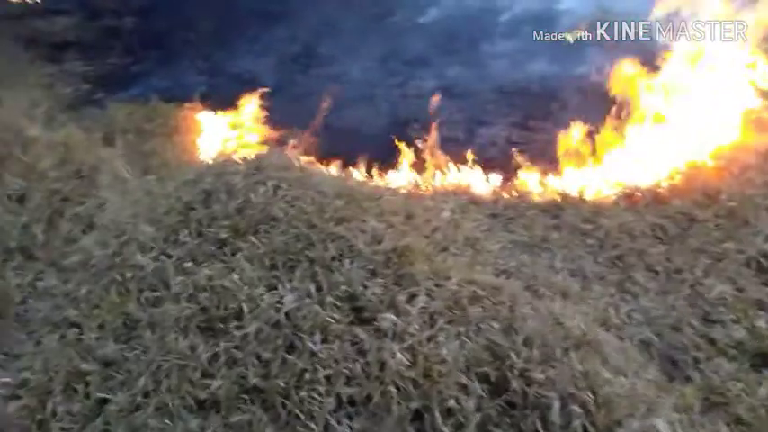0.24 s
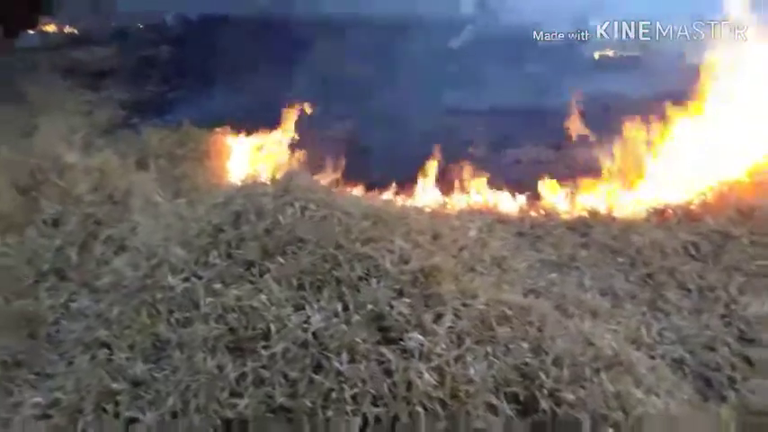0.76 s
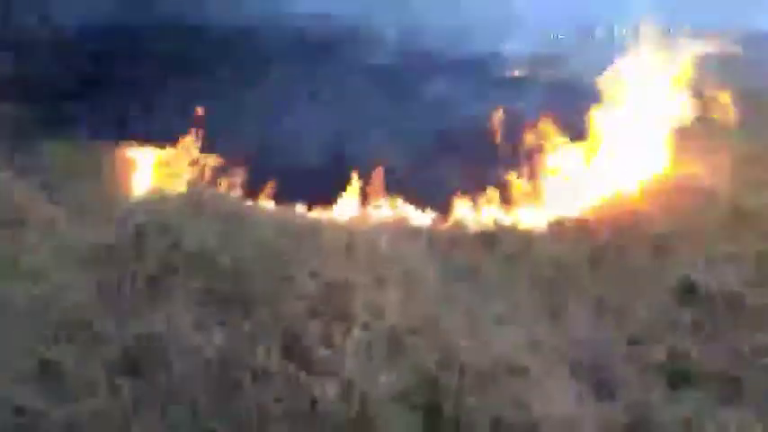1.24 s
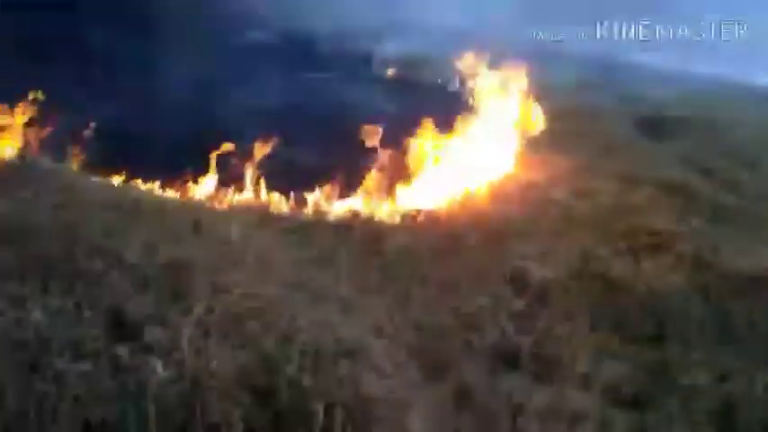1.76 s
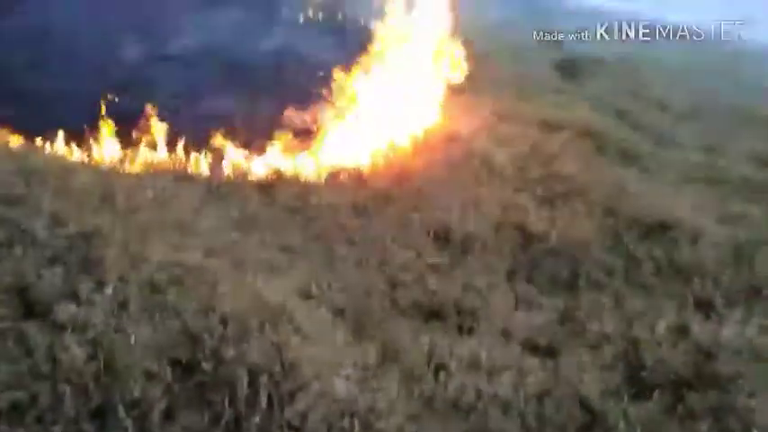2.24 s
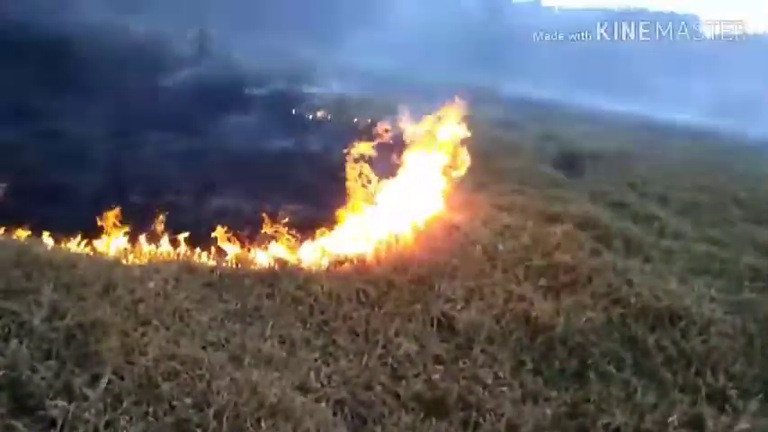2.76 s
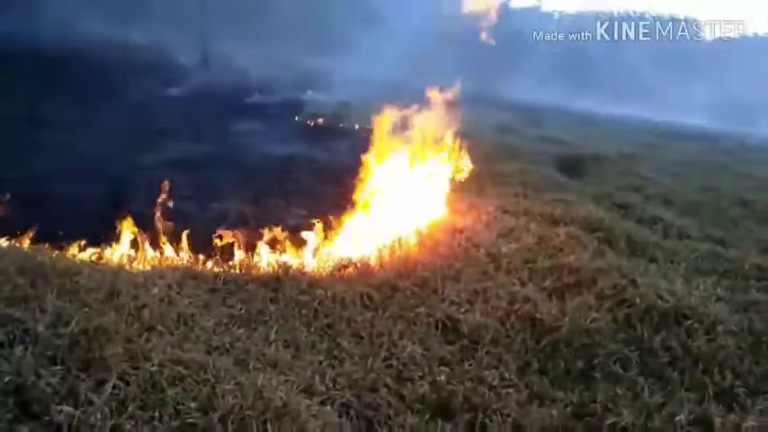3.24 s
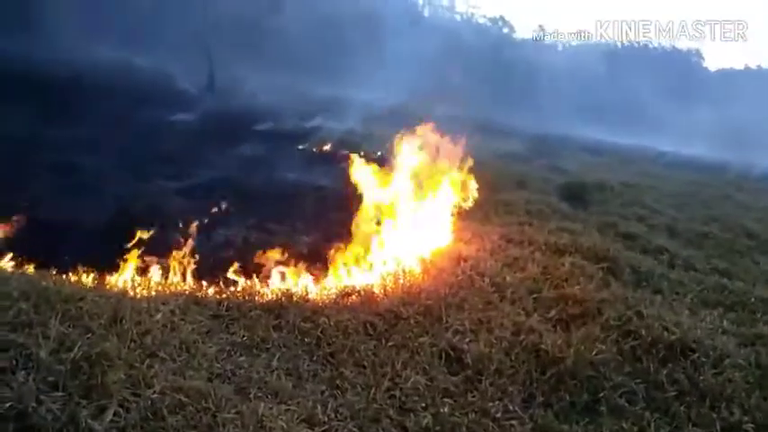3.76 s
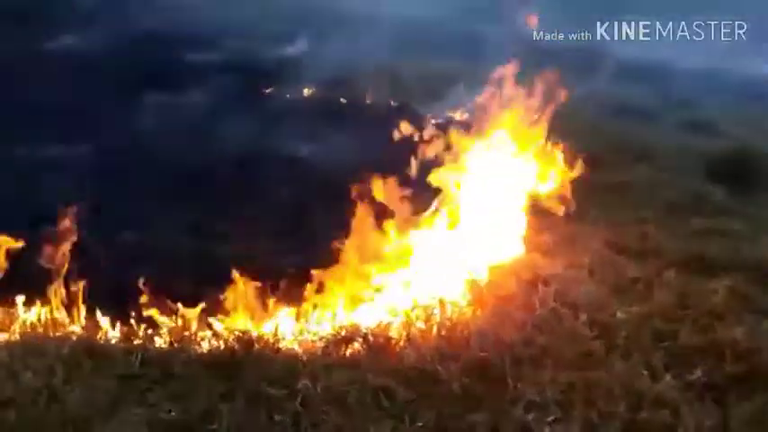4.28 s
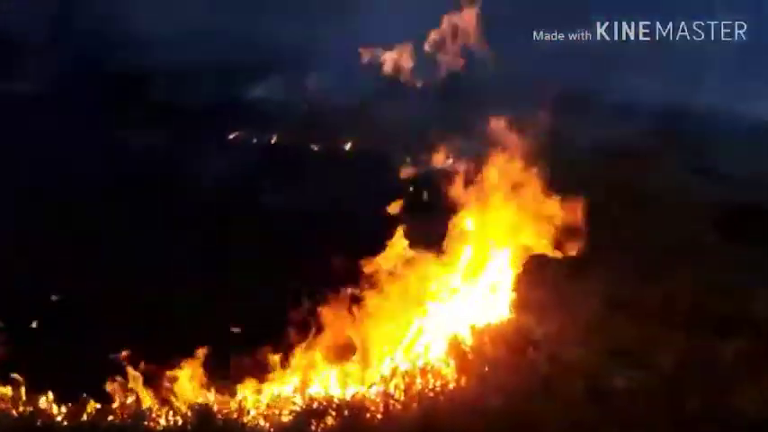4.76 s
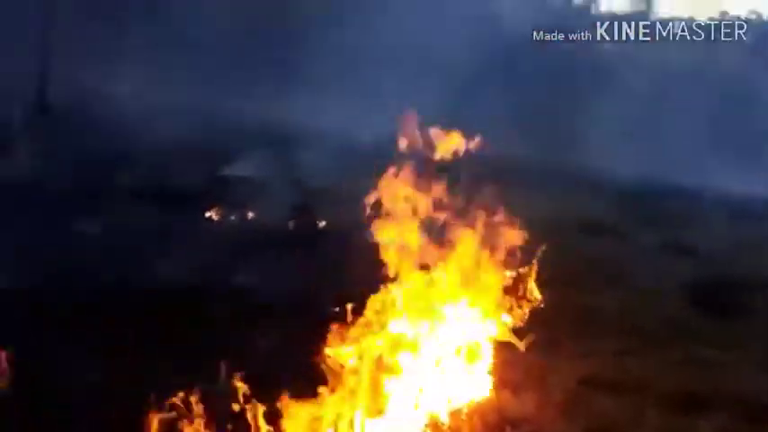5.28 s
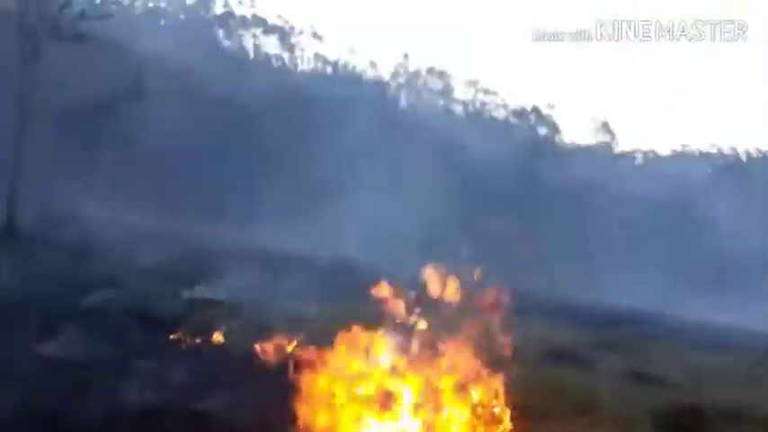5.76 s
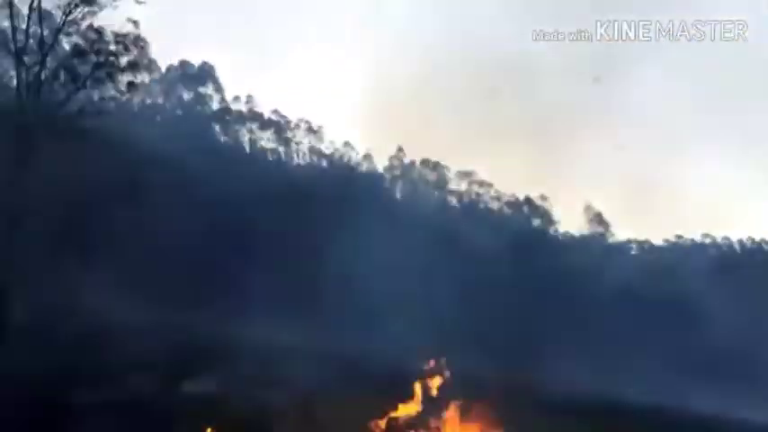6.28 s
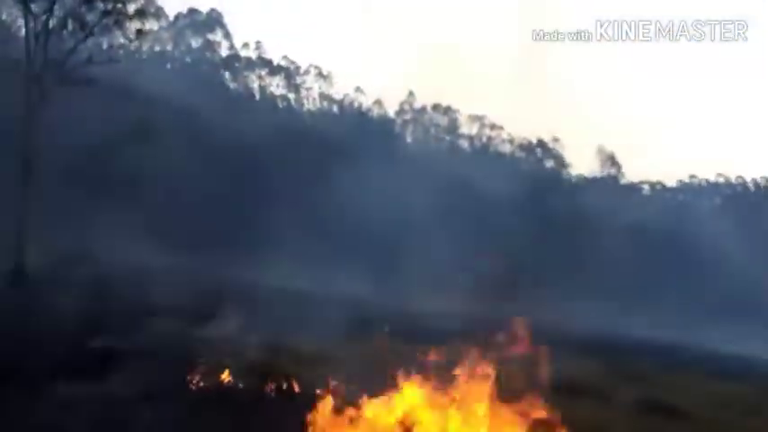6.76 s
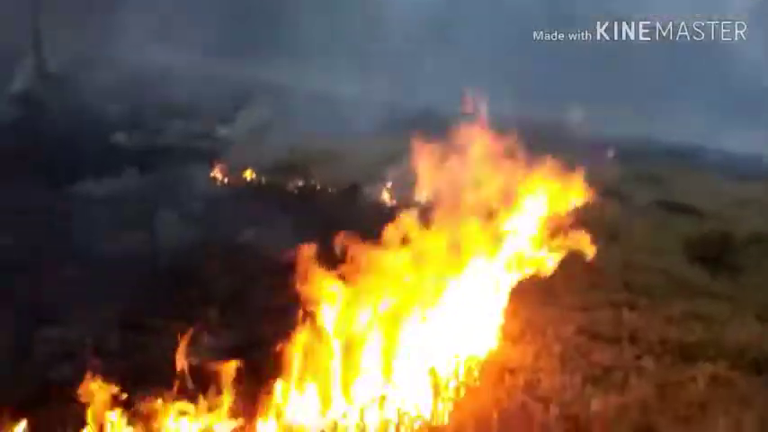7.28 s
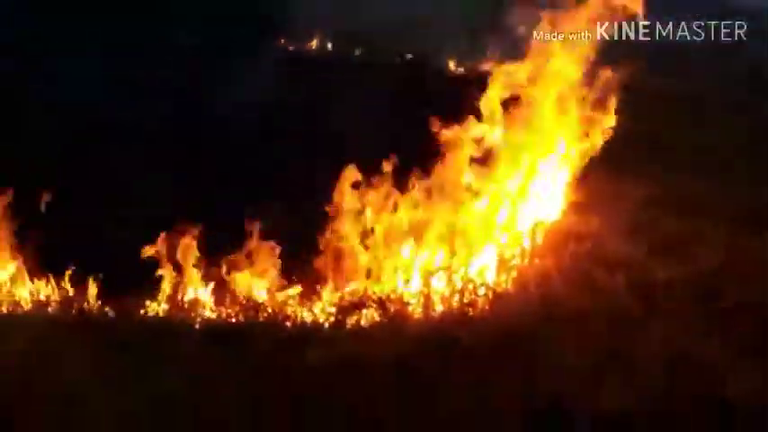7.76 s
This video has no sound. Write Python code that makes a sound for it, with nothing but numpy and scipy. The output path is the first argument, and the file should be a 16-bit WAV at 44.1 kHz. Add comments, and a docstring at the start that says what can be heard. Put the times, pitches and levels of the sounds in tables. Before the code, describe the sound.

Close, outdoor grass fire captured on a hand-held phone with wide stereo and no room echo. Constant fine hiss and fizz carry countless tiny crackles, with louder stalks cracking irregularly, some bright and ticking, others dull and woody. Underneath, a soft low flame roar flutters and puffs. The first two and a half seconds are roughest, with gusts and thumps; later it settles, thins, and ends with a fresh burst of snaps and rising sizzle.

```python
"""A thin sizzle and faint snaps of burning dry grass fade in; then flames rush, rumble, puff, thump and whoosh.
Flame noise is coloured noise in flickering lumps, its level set by a steady burn and surges; snaps and crackle
are torn-fibre bursts ringing hollow stalks, puffs and thumps short low tones, buffeting separate noise per port.
A hand-held phone hears it at one bright and one dull port; each is subtracted late from the other for width."""
import sys
import numpy as np
from scipy import signal
from scipy.fft import rfft, irfft, next_fast_len
from scipy.io import wavfile
from scipy.ndimage import map_coordinates

SR = 44100
rng = np.random.default_rng(int(sys.argv[2]) if len(sys.argv) > 2 else 0)


def put_to_file(sound):
    """Save the sound as 16-bit audio at rate SR, in the file named by the first command-line argument."""
    columns = np.atleast_2d(sound).T  # one column per channel
    safe = np.clip(columns, -1, 1)
    whole_steps = np.round(safe * 32767)
    wavfile.write(sys.argv[1], SR, whole_steps.astype(np.int16))


def invert_db(level):
    """Linear amplitude ratio for a level in decibels (20 dB per decade), elementwise."""
    return 10 ** (np.asarray(level, dtype=float) / 20)


N = 353682  # samples
START_S = .165  # the sound fades in here


def along(points, hz):
    """Interpolates (f/Hz, value) points on a log frequency axis."""
    f, value = np.transpose(points)
    return np.interp(np.log(hz + 1), np.log(f + 1), value)


def unit(x):
    """Scales to rms 1."""
    return x / np.sqrt(np.mean(x ** 2) + 1e-20)


def wobble(rate):
    """A smooth random curve with rate knots a second."""
    knots = rng.standard_normal(int(N * rate / SR) + 4)
    return map_coordinates(knots, [np.arange(N) * rate / SR])


def filtered(x, response):
    """Multiplies the spectrum by a complex response of frequency."""
    size = next_fast_len(N + 8192)
    return irfft(rfft(x, size) * response(np.fft.rfftfreq(size, 1 / SR)), size)[..., :N]


def resonance(f, hz, width_hz):
    """A causal resonance of gain 1 at its centre."""
    damping = 1j * f * width_hz
    return damping / (hz * hz - f * f + damping + 1e-9)


def pair(shape, alike):
    """Noise for both ports that share the part alike of its power."""
    common = rng.standard_normal(shape)
    own = rng.standard_normal((2,) + shape)
    return np.sqrt(alike) * common + np.sqrt(1 - alike) * own


def lumpy_noise(spectrum, alike, lumps_db):
    """Coloured noise at both ports, swelling in lumps, with rms 1 overall."""
    lumps = invert_db(lumps_db) * pair((N,), alike)
    return unit(filtered(lumps, lambda hz: invert_db(along(spectrum, hz))))


def place(times, shapes):
    """Sums short shapes (ports, events, samples) at their times."""
    at = np.round(times * SR).astype(int)[:, None] + np.arange(shapes.shape[-1])
    return np.array([np.bincount(at.ravel(), port.ravel(), N + SR)[:N] for port in shapes])


def flares(times, db, rise_s, fall_s):
    """A gain that leaps at each time and dies away exponentially."""
    t = np.arange(SR // 8) / SR
    kicks = np.bincount(np.round(times * SR).astype(int), invert_db(db), N)[:N]
    return signal.fftconvolve(kicks, (1 - np.exp(-t / rise_s)) * np.exp(-t / fall_s))[:N]


def crests(base_db, s, db, climb_s, sink_s):
    """A level in dB: swells climb to a crest and sink again, their power added to a base."""
    time = np.arange(0, N + 64, 64) / SR
    since = time - s[:, None]
    # time per 10 dB, held between 5 ms and 1 s
    pace_s = np.clip(np.where(since < 0, climb_s[:, None], sink_s[:, None]), .005, 1)
    swells = invert_db(db[:, None] - 10 * np.abs(since) / pace_s) ** 2
    power = np.interp(np.arange(N) / SR, time, swells.sum(axis=0))
    return 10 * np.log10(invert_db(base_db) ** 2 + power)


# the steady burn between surges: t/s, sizzle level/dB, roar level/dB, extra rumble level/dB
STEADY_BURN = [(.18, -54.5, -55.5, -14), (.3, -47, -48.5, 0.5), (.76, -47, -52, 1), (1.0, -50, -48, 5),
               (1.3, -42, -48, 2.5), (1.72, -73, -50, -2.5), (1.95, -50, -53, -1), (2.4, -50, -43.5, -2.5),
               (2.9, -50, -51, -2.5), (3.55, -51, -46.5, -1.5), (4.02, -51.5, -56.5, -1.5),
               (4.69, -58, -55.5, -2.5), (5.25, -54.5, -52.5, -2), (5.65, -47, -51, -2),
               (6.28, -54, -58.5, 1.5), (6.75, -49.5, -55.5, 0), (7.1, -52.5, -53, 0.5),
               (7.58, -49.5, -55, -3.5), (8, -41, -56.5, -0.5)]
# fresh tufts catch and the fire surges: crest t/s, sizzle level/dB, roar level/dB,
# climb of 10 dB t/s, sink of 10 dB t/s
FIRE_SURGES = [(0.375, -39, -41, -0.07, 0.19), (.93, -48, -45, 0.05, -0.05), (1.1, -40, -44.5, 0.08, 0.2),
               (1.3, -36, -39.5, 0.05, 0), (1.392, -31.5, -36, 0.03, 0.12), (1.47, -41, -38, 0.15, 0),
               (1.6, -37, -61, 0.15, 0.15), (1.807, -37.5, -37.5, -0.02, 0.11),
               (2.17, -44.5, -50, 0.04, 0.4), (2.51, -39.5, -42.5, 0.1, 0.08), (2.69, -40.5, -63, 0, 0.2),
               (3.1, -42.5, -51.5, 0.2, 0.3), (3.477, -36, -43, 0.16, 0.03),
               (3.595, -38, -41.5, 0.08, 0.06), (3.675, -31, -41, 0.035, 0.09),
               (3.81, -41.5, -48, 0.1, 0.27), (4.06, -42.5, -49, 0.01, 0.4),
               (4.302, -38.5, -42, 0.04, 0.13), (4.45, -36.5, -44.5, 0.02, 0.1),
               (4.87, -42, -54, 0.18, 0.1), (5.001, -39.5, -51.5, 0, 0.25), (5.18, -46.5, -50.5, 0.6, 0.2),
               (5.32, -38.5, -43, -0.14, 0.16), (5.45, -36, -55, -0.01, 0.06),
               (5.95, -39.5, -50.5, 0.16, 0.15), (6.07, -45.5, -56, -0.2, 0.16), (6.42, -46, -56, 0.1, 0),
               (6.65, -47, -51, 0.05, 0.4), (6.84, -45, -55, 0, 0.1), (7.16, -46.5, -46, 0.1, 0.4),
               (7.34, -39, -42, 0.13, 0.08), (7.45, -43.5, -58, -0.03, 0.7),
               (7.667, -38, -38.5, 0.01, 0.14)]
USUAL_ROAR_DB = -50


def burn_levels():
    """Surges of fresh fuel stand on the steady burn: sizzle, roar about its usual, extra rumble, in dB."""
    time = np.arange(N) / SR
    s, steady_sizzle_db, steady_roar_db, deep_db = np.transpose(STEADY_BURN)
    crest_s, crest_sizzle_db, crest_roar_db, climb_s, sink_s = np.transpose(FIRE_SURGES)
    sizzle_db = crests(np.interp(time, s, steady_sizzle_db), crest_s, crest_sizzle_db, climb_s, sink_s)
    roar_db = crests(np.interp(time, s, steady_roar_db), crest_s, crest_roar_db, climb_s, sink_s)
    return sizzle_db, roar_db - USUAL_ROAR_DB, np.interp(time, s, deep_db)


def tuft_flicker():
    """Tufts flare up fast and sink more slowly; the log of their summed flame."""
    when, size = rng.random((260, 2)).T
    flare_db = -3.5 * np.log(1 - .92 * size)  # many faint, few strong
    return np.log(0.19 + flares(when * N / SR, flare_db, 0.0036, 0.013))


# sizzle colour, then the higher fizz colour: f/Hz, relative level/dB
SIZZLE_COLOUR = [(500, -23), (1200, -28), (2500, 10.5), (4000, 7), (7000, 3), (11000, 6), (14000, -18),
                 (15300, -14), (15900, -45)]
FIZZ_COLOUR = [(5000, -21.5), (8000, -5.5), (11000, -2), (14000, -6), (15300, -7), (15900, -54)]
# fizz against the sizzle: t/s, level/dB
FIZZ_OVER_SIZZLE = [(.2, 5), (1, 14), (1.4, 0), (2.5, -2), (3.5, -1), (4.7, 1.5), (6, 2.5), (7.2, 1.5),
                    (8, 2.5)]
FLAME_TRIM_DB = -5  # sizzle and fizz against the burn's sizzle level


def sizzle(sizzle_db, flicker):
    """Tiny cracks merge into a hiss and a finer fizz, both grained by the same flicker."""
    grain_db = 3.45 * flicker + 1.12 * wobble(120) + 0.68 * wobble(500)
    fizz_db = sizzle_db + np.interp(np.arange(N) / SR, *np.transpose(FIZZ_OVER_SIZZLE))
    hiss = invert_db(sizzle_db) * lumpy_noise(SIZZLE_COLOUR, 0.11, grain_db)
    fizz = invert_db(fizz_db) * lumpy_noise(FIZZ_COLOUR, 0.078, grain_db)
    return invert_db(FLAME_TRIM_DB) * (hiss + fizz)


# flame rush colour: f/Hz, relative level/dB
RUSH_COLOUR = [(200, 5.5), (400, -3.5), (550, 3), (750, 4), (1000, -8.5), (1500, -22), (3000, -72)]
RUSH_DB, RUSH_SWING = -53, 1.08  # level at the usual roar, dB of swing per dB of roar


def flame_rush(roar_db, flicker):
    """Flame turbulence: mid-range noise, largely alike at the ports, that swells with the roar."""
    lumps_db = 4.0 * flicker + 3 * wobble(60)
    return invert_db(RUSH_DB + RUSH_SWING * roar_db) * lumpy_noise(RUSH_COLOUR, 0.81, lumps_db)


# flame rumble colour: f/Hz, relative level/dB
RUMBLE_COLOUR = [(20, -52), (50, -10), (90, -2), (140, -0.5), (200, -4), (300, -12.5), (450, -29.5),
                 (900, -40)]
RUMBLE_DB, RUMBLE_SWING = -42.5, 0.65  # level at the usual roar, dB of swing per dB of roar


def flame_rumble(roar_db, deep_db, flicker):
    """The low roar of the flames, identical at both ports."""
    lumps_db = 3.5 * flicker + 2.23 * wobble(25)
    level_db = RUMBLE_DB + deep_db + RUMBLE_SWING * roar_db
    return invert_db(level_db) * lumpy_noise(RUMBLE_COLOUR, 1.0, lumps_db)


DIP_NEAR_HZ, DIP_FAR_HZ, DIP_WIDTH_HZ, DIP_DEPTH = 358, 488, 160, 0.75
# the hollow changes place between these two: t/s
DIP_SHIFT_S = (0.98, 5.3)
# bands that colour the early roar; a negative gain hollows: f/Hz, width f/Hz, linear gain
EARLY_ROAR_BANDS = [(570, 106, 0.77), (810, 190, -0.55), (1017, 52, 3.5)]
LATE_BAND_HZ, LATE_BAND_WIDTH_HZ, LATE_BAND_GAIN = 803, 160, 0.61


def hollowed(x):
    """A dip, probably the echo off the ground, cross-fades from one place to a higher one."""
    def dip(f, hz):
        return 1 - DIP_DEPTH * resonance(f, hz, DIP_WIDTH_HZ)

    def early(f):
        bands = sum(gain * resonance(f, hz, width_hz) for hz, width_hz, gain in EARLY_ROAR_BANDS)
        return dip(f, DIP_NEAR_HZ) * (1 + bands)

    def late(f):
        band = LATE_BAND_GAIN * resonance(f, LATE_BAND_HZ, LATE_BAND_WIDTH_HZ)
        return dip(f, DIP_FAR_HZ) * (1 + band)

    share = np.interp(np.arange(N) / SR, DIP_SHIFT_S, [0, 1])
    return (1 - share) * filtered(x, early) + share * filtered(x, late)


# air moving past the ports: crest t/s, level/dB, climb of 10 dB t/s, sink of 10 dB t/s
AIR_GUSTS = [(.6, -43, 0.06, -0.7), (0.839, -38.5, 0.26, 0.04), (1.15, -46.5, 0.3, 1),
             (1.489, -33.5, 0, 0.08), (1.65, -41, 0.45, 0.7), (7.69, -49, 0.55, 11.5)]
# buffeting colour: f/Hz, relative level/dB
BUFFET_COLOUR = [(20, -25), (50, -4), (100, -6), (180, -1.5), (300, -11), (600, -10), (1100, -25.5)]
CALM_DB = -64.5  # buffeting between gusts


def buffeting():
    """Moving air makes low noise at each port independently."""
    level_db = crests(CALM_DB, *np.transpose(AIR_GUSTS))
    return invert_db(level_db) * lumpy_noise(BUFFET_COLOUR, 0, 5.2 * wobble(40))


# colour of tearing fibres: f/Hz, relative level/dB
CRACK_COLOUR = [(200, -3), (700, -8.5), (1500, -4.5), (4000, 1), (8000, 8), (13000, 9.5), (15500, -2.5),
                (16800, -33)]


def cracks(rows, spiky_db, pitch_db, width, alike, pop):
    """Each crack is a burst of tearing fibres that rings its hollow stalk and thuds in the tuft."""
    s, db, hz, treble_db = np.transpose(rows)[..., None]
    size = 640  # samples per crack
    t, f = np.arange(size) / SR, np.fft.rfftfreq(size, 1 / SR)
    fibres = invert_db(spiky_db * rng.standard_normal((len(s), size))) * pair((len(s), size), alike)
    # the envelope is 60 dB down after 12 ms
    burst = fibres * (1 - np.exp(-t / 0.00036)) * invert_db(-60 * (t / 0.012) ** 3.1)
    # the hardest rupture comes soon after the tearing starts
    since = t - 0.001108 * rng.random(s.shape) ** 1.445
    burst = burst * (1 + 3.04 * np.exp(-np.abs(since) / 0.00078))
    # thick, dull stalks suck the air in one sharp stroke
    stroke = np.clip(since, 0, 1) / 0.00009
    suction = pop * invert_db(-0.3 * np.clip(treble_db, -15, 15))
    burst = burst - suction * stroke * np.exp(1 - stroke)
    treble = invert_db(treble_db * np.clip(np.log2((f + 1) / 4200), 0, 1))  # full from 8400 Hz up
    stalk = 1 + invert_db(pitch_db) * resonance(f, hz, width * hz)
    tuft = 1 + invert_db(3.0) * resonance(f, 704, 152)
    ring = 1 + 0.17 * resonance(f, 3750, 420)
    shapes = irfft(rfft(burst) * invert_db(along(CRACK_COLOUR, f)) * treble * stalk * tuft * ring, size)
    shapes = np.roll(shapes, 16, axis=-1)  # ringing ahead of the onset moves from the end to the front
    # level is the rms of both ports with all energy taken over 3 ms
    rms = np.sqrt(np.sum(shapes ** 2, axis=(0, 2)) / (2 * .003 * SR))[:, None]
    return place(s[:, 0], invert_db(db) * shapes / rms)


def crackle(sizzle_db):
    """Small cracks at random times, louder where the sizzle is louder."""
    when, size, pitch, bright = rng.random((1100, 4)).T
    when = START_S + when * (N / SR - START_S)
    # many faint, few strong
    db = sizzle_db[(when * SR).astype(int)] - 3.5 - 3.25 * np.log(1 - .97 * size)
    small = np.transpose([when, db, 800 * 9 ** pitch, -8 + 12 * bright])
    return cracks(small, spiky_db=6.5, pitch_db=8.5, width=0.12, alike=0.0086, pop=2.1)


# loud stalks: t/s, level/dB, stalk pitch f/Hz, treble level/dB
LOUD_SNAPS = [(0.1815, -45, 3270, -8), (0.198, -45, 1100, -27), (0.21, -42.5, 6000, -7),
              (0.259, -36, 3100, -4), (0.352, -33.5, 4440, 0), (0.3702, -34, 2700, -20),
              (0.381, -34, 2660, -21), (0.452, -33, 8850, 13), (0.612, -28.5, 8700, 1),
              (0.658, -27.5, 10000, -11.5), (0.699, -21, 3400, -0.5), (0.796, -35.5, 2930, -1),
              (0.9254, -30, 9860, -2), (0.932, -31, 4970, 1), (1.0369, -31.5, 573, -25),
              (1.0547, -30.5, 9520, -6), (1.298, -26, 690, -8), (1.305, -30, 9990, -13),
              (1.315, -33, 4970, -13), (1.3516, -20, 1710, -3), (1.3859, -20, 2310, -24),
              (1.395, -23, 3000, -22), (1.4316, -27.5, 5730, -6), (1.4425, -23.5, 4970, -3),
              (1.4968, -23, 690, -6), (1.528, -26, 3170, -11), (1.537, -25.5, 600, -5),
              (1.5861, -21.5, 1250, -12.5), (1.6808, -21.5, 5400, -8), (1.75, -29.5, 687, -20),
              (1.775, -23, 1310, -14), (1.794, -28, 1410, -15.5), (1.8119, -27, 690, -5),
              (1.8341, -16.5, 3700, -4), (1.9076, -29, 1320, -4), (2.1595, -26.5, 1480, -9.5),
              (2.2987, -33.5, 716, -21), (2.3733, -35, 1110, -42), (2.5, -35, 5450, -12),
              (2.531, -25, 4000, 5), (2.62, -34, 2150, -16), (2.68, -31, 3800, -13),
              (2.731, -26, 6800, -15), (2.7605, -35, 7410, -2), (2.8087, -24, 1370, -20),
              (2.8713, -24, 2920, -10.5), (2.9614, -38.5, 700, -31.5), (2.9818, -36, 3370, -4),
              (3.0145, -31, 9700, -14.5), (3.0546, -39.5, 900, -3), (3.139, -35, 5460, -9),
              (3.2497, -34.5, 4150, -10), (3.2707, -37, 740, -26), (3.278, -37.5, 2980, -24),
              (3.385, -29.5, 10400, -10.5), (3.4544, -31, 730, -24), (3.4764, -27.5, 8050, -6),
              (3.57, -31.5, 6330, -12), (3.5736, -26.5, 9730, -6), (3.593, -29, 3980, -13),
              (3.651, -32, 4000, -15), (3.673, -29.5, 3800, -18), (3.692, -35, 6000, -8),
              (3.7247, -46, 9000, 5), (3.734, -33, 9300, 0), (3.7411, -24, 2650, -1),
              (3.791, -29, 7970, -3), (3.803, -34, 8010, -9), (3.812, -23.5, 8200, -10.5),
              (3.8426, -33.5, 676, -19), (3.9196, -34, 760, -29), (3.992, -38, 3500, -13),
              (4.021, -41, 6000, -2), (4.0488, -26, 3340, -3), (4.066, -31, 7950, -9),
              (4.154, -25, 3500, -12), (4.228, -37, 9910, 6), (4.2913, -27.5, 8010, 17),
              (4.2992, -31.5, 4390, -15), (4.3055, -30, 3040, -15), (4.32, -31, 2930, 0),
              (4.3344, -24, 9200, -9.5), (4.3434, -27, 2450, 1.5), (4.412, -28.5, 8400, -14),
              (4.452, -35.5, 8500, 4), (4.466, -31, 4000, 3), (4.498, -34, 8500, -5),
              (4.5283, -30, 3070, 1), (4.5746, -32, 9130, -3), (4.585, -23, 8000, -4.5),
              (4.773, -32.5, 2000, 1), (4.858, -29, 6500, 2), (4.8896, -32, 4600, -3),
              (4.898, -34.5, 3720, -11), (4.958, -36.5, 597, -30), (5, -34.5, 3700, -9),
              (5.19, -35, 6200, 3), (5.098, -41, 690, -19), (5.3077, -32.5, 720, -9), (5.34, -38, 8500, 8),
              (5.4138, -28.5, 1550, -9), (5.432, -25.5, 3430, -2.5), (5.4423, -22.5, 800, -8.5),
              (5.467, -22.5, 7700, 6), (5.647, -34.5, 2800, -2.5), (5.703, -37, 4000, -8),
              (5.8955, -32, 846, -2), (5.924, -31, 736, -1), (5.936, -28.5, 9650, 2.5),
              (5.9632, -29, 4000, -2.5), (5.9978, -24.5, 8600, -1), (6.038, -36.5, 6000, -13),
              (6.082, -36.5, 3600, -4.5), (6.312, -29, 4970, 6), (6.3265, -31.5, 2800, -1),
              (6.3342, -35.5, 1770, -19), (6.398, -36, 8610, 4), (6.414, -31, 2640, -2.5),
              (6.424, -24.5, 8700, -3), (6.5212, -30.5, 5300, -7.5), (6.577, -36, 3400, -1),
              (6.593, -29.5, 8800, 6), (6.6536, -35.5, 3130, -23), (6.742, -30, 8500, -4.5),
              (6.833, -33, 8660, -7), (6.8596, -35.5, 3500, -1), (6.94, -30.5, 8850, -1),
              (7.105, -38, 10000, 10), (7.84, -36, 8800, 8), (7.143, -33.5, 9100, -6),
              (7.177, -28.5, 680, -9.5), (7.2987, -21, 2460, -13.5), (7.3061, -34, 2500, -15),
              (7.331, -26, 6800, -11), (7.336, -18, 4760, -4), (7.3529, -18.5, 2200, -16),
              (7.4197, -29, 9520, 2), (7.4436, -30.5, 2450, -0.5), (7.48, -27.5, 2300, -7),
              (7.5551, -32, 3530, -19), (7.6107, -39, 4000, -9), (7.6707, -28.5, 1340, -5),
              (7.7818, -26, 814, -11), (7.8649, -27, 3500, -16), (7.9037, -23.5, 3440, -6),
              (7.926, -31, 8400, -6), (7.97, -28, 9850, -5)]


def snaps():
    """Loud stalks crack one by one, each trailing a spray of steam and splinters."""
    s, db = np.transpose(LOUD_SNAPS)[:2]
    spray_gain = flares(s, db - 23, 0.00027, 0.011)
    spray = spray_gain * lumpy_noise(CRACK_COLOUR, 0.046, 0.75 * wobble(1000))
    return cracks(LOUD_SNAPS, spiky_db=4.5, pitch_db=6.0, width=0.39, alike=0.13, pop=2.93) + spray


# pockets of gas catching: crest t/s, level/dB before the port gains, f/Hz
GAS_PUFFS = [(0.238, -38.5, 188), (0.415, -33, 190), (0.592, -33.5, 196), (0.826, -27, 148),
             (0.877, -34, 166), (1.148, -29.5, 191), (1.281, -33, 181), (1.402, -28, 135),
             (1.472, -26.5, 167), (2.876, -33, 204), (3.022, -33.5, 194), (3.602, -33.5, 186),
             (4.117, -35, 171), (4.435, -32.5, 161), (4.961, -33, 242), (5.025, -32.5, 172),
             (5.361, -35, 200), (5.912, -35, 182), (6.672, -36, 212), (7.185, -31.5, 178),
             (7.871, -32.5, 177)]


def puffs():
    """Each pocket of gas makes a soft swell of about two cycles, nearly alike at both ports."""
    s, db, hz = np.transpose(GAS_PUFFS)[..., None]
    lead_s = .012  # from the start of the shape to its crest
    cycles = hz * (np.arange(1500) / SR - lead_s)
    phase = 2 * np.pi * rng.random(s.shape)
    shape = np.sin(2 * np.pi * cycles + phase) * np.exp(-(cycles / 0.66) ** 2)
    port_gain = np.array([2.5, 2.1])[:, None, None]
    return place(s[:, 0] - lead_s, invert_db(db) * shape * port_gain)


# puffs of air on the ports: t/s, level/dB before the port gains, nominal f/Hz before the sag
AIR_THUMPS = [(1.302, -18.5, 390), (1.499, -6.5, 137), (1.566, -19.5, 114), (1.673, -24, 134),
              (1.772, -27, 123), (1.886, -26, 153), (1.963, -16, 152), (2.151, -24.5, 129),
              (2.316, -17, 149), (2.372, -16, 203), (2.491, -18, 121), (3.664, -17.5, 200),
              (7.69, -15, 102)]


def thumps():
    """A puff of air rocks the ports oppositely, mostly the dull one, for a cycle or two sagging in pitch."""
    s, db, hz = np.transpose(AIR_THUMPS)[..., None]
    t = np.arange(2600) / SR
    # the pitch sinks to 0.75 of its nominal value
    turns = hz * (0.75 * t + 1.66 * 0.0027 * (1 - np.exp(-t / 0.00079)))
    envelope = (1 - np.exp(-t / 0.001)) * np.exp(-(hz * t / 1.36) ** 2.9)
    port_gain = np.array([-.15, .95])[:, None, None]
    return place(s[:, 0], invert_db(db) * np.sin(2 * np.pi * turns) * envelope * port_gain)


# single whooshes: crest t/s, level/dB, climb of 10 dB t/s, sink of 10 dB t/s
WHOOSH_CRESTS = [(1.462, -41, .012, 0.22), (2.525, -32, 0.041, 0.073)]
# whoosh colour: f/Hz, relative level/dB
WHOOSH_COLOUR = [(200, -2.5), (550, 0.5), (1600, -12), (3200, -26)]


def whooshes():
    """Broad noise swells quickly and sinks, partly alike at the ports."""
    level_db = crests(-120, *np.transpose(WHOOSH_CRESTS))
    return invert_db(level_db) * lumpy_noise(WHOOSH_COLOUR, 0.44, 2.9 * wobble(60))


def scene():
    """Burn and flicker drive the flame sounds together; the other sources keep their own times."""
    sizzle_db, roar_db, deep_db = burn_levels()
    flicker = tuft_flicker()
    roar = hollowed(flame_rush(roar_db, flicker) + flame_rumble(roar_db, deep_db, flicker))
    flames = sizzle(sizzle_db, flicker) + roar + crackle(sizzle_db)
    return flames + buffeting() + snaps() + puffs() + thumps() + whooshes()


def band_limit(x):
    """A steep low-pass at the top of the band."""
    return signal.sosfilt(signal.butter(12, 16630, fs=SR, output="sos"), x)


# dull port against the bright one: f/Hz, level/dB
DULL_PORT_COLOUR = [(100, 0.5), (400, 2), (800, -0.5), (2000, 2.5), (4000, -1.5), (7000, -2), (10000, -5),
                    (14000, -13.5)]
# the late subtracted copy: f/Hz, level/dB
CROSS_COLOUR = [(100, 1.5), (1200, -6), (2500, -5), (5000, -8), (7500, -6.5), (10000, -12.5), (13000, -34)]
CROSS_S = 0.0004066  # lateness of the subtracted copy
TOP_HZ = 15700  # the mix holds nothing from here up


def record(dry):
    """Port colour, a bass cut and a treble limit, late cross-subtraction for width, and the fade-in."""
    def tone_response(hz):
        below_top = hz < TOP_HZ
        bass_cut = (1j * hz / (45 + 1j * hz)) ** 2
        port_colour = invert_db([0 * hz, along(DULL_PORT_COLOUR, hz)])
        return below_top * bass_cut * port_colour

    def cross_response(hz):
        return invert_db(along(CROSS_COLOUR, hz)) * np.exp(-2j * np.pi * hz * CROSS_S)

    ports = filtered(dry, tone_response)
    late = filtered(ports, cross_response)
    wide = ports[::-1] - late  # left: dull port less the bright one; right: the reverse
    opening = np.clip((np.arange(N) / SR - START_S) / 0.018, 0, 1) ** 2
    return band_limit(wide * opening)


dry = scene()
out = record(dry)
put_to_file(out)
```